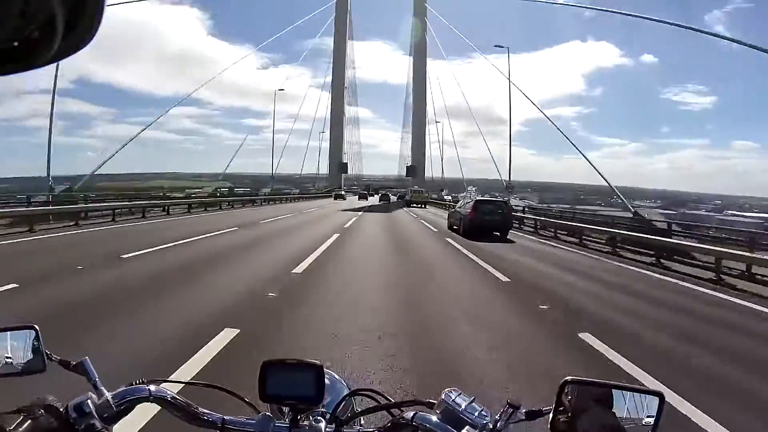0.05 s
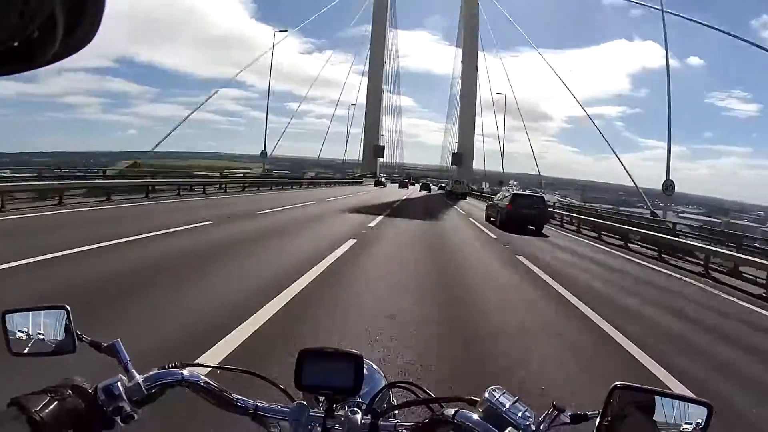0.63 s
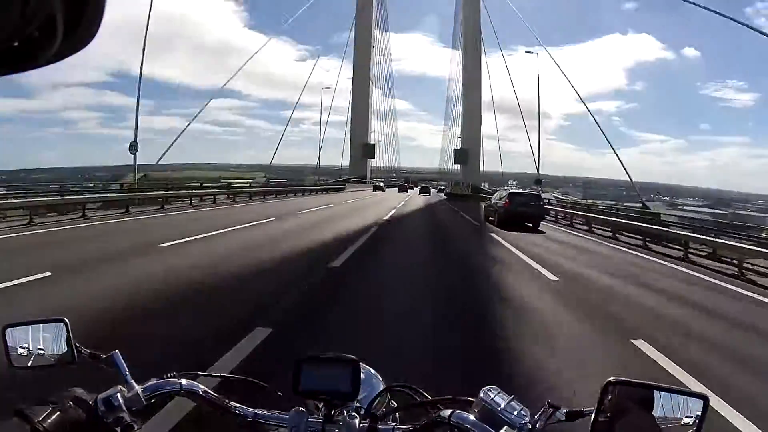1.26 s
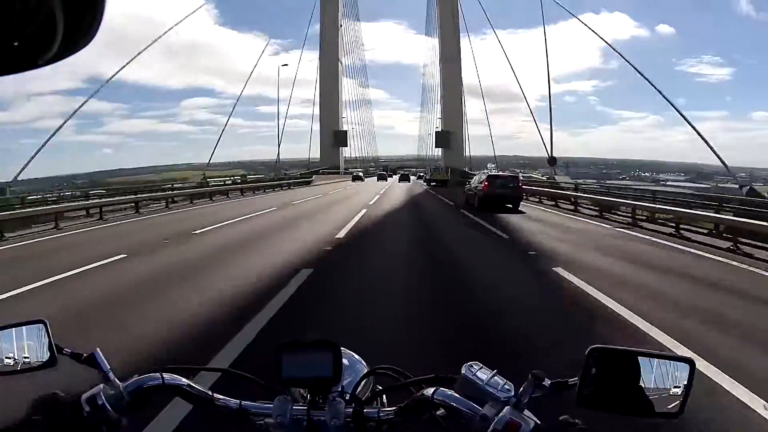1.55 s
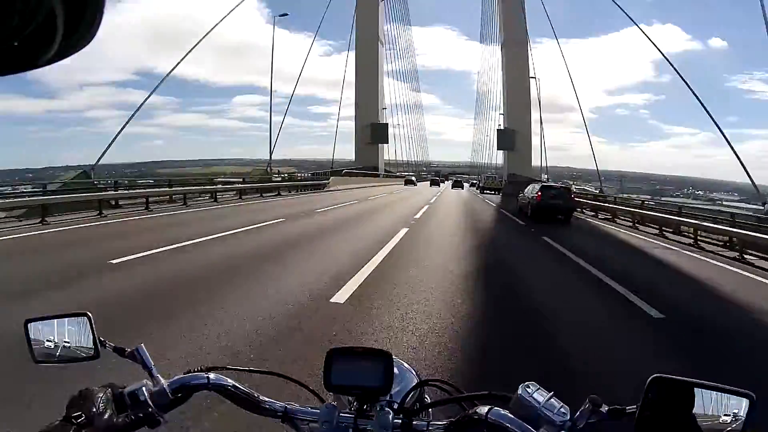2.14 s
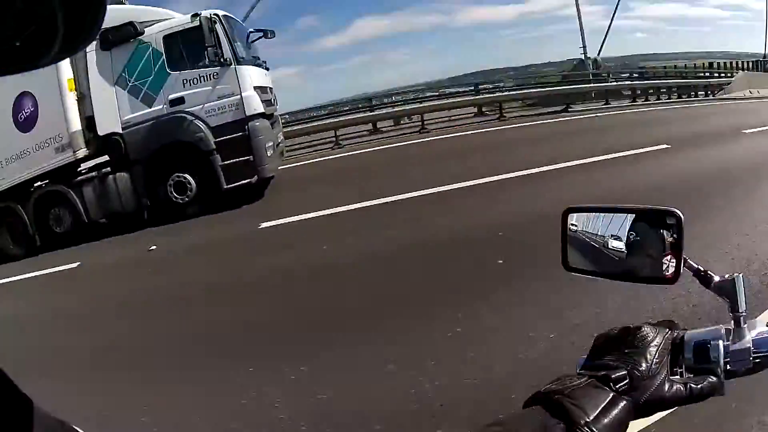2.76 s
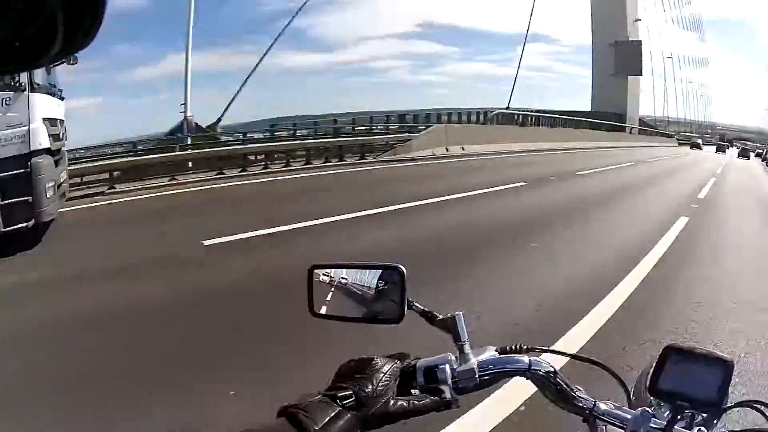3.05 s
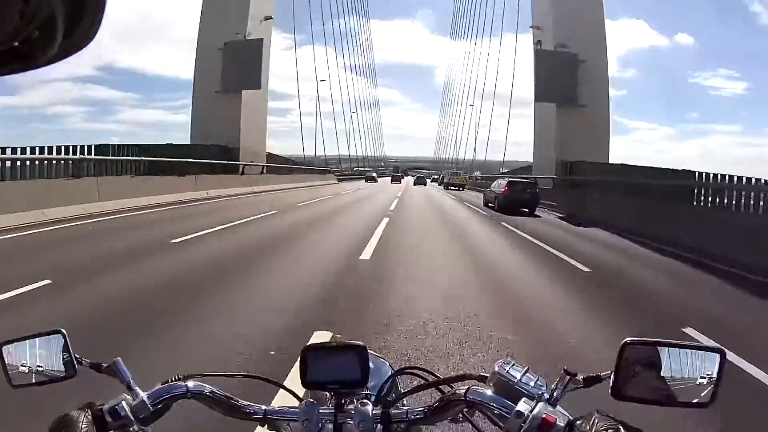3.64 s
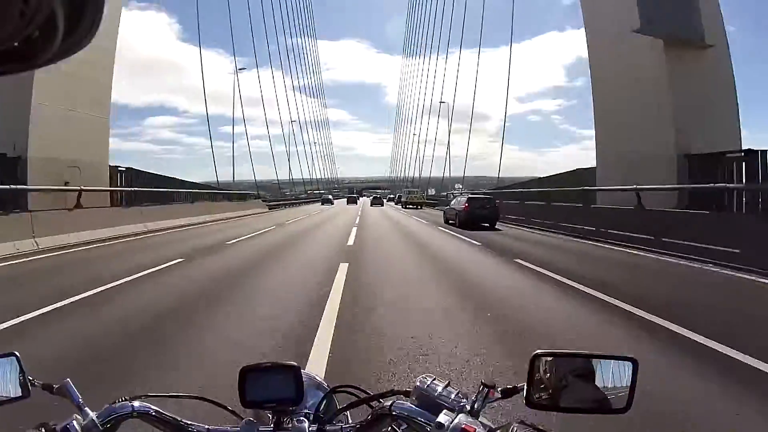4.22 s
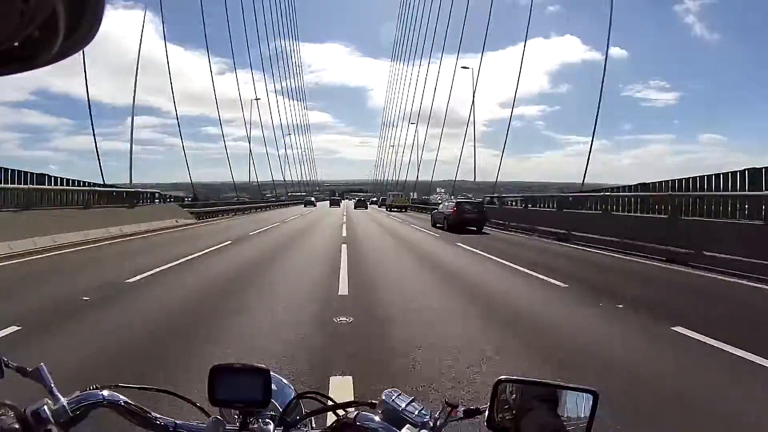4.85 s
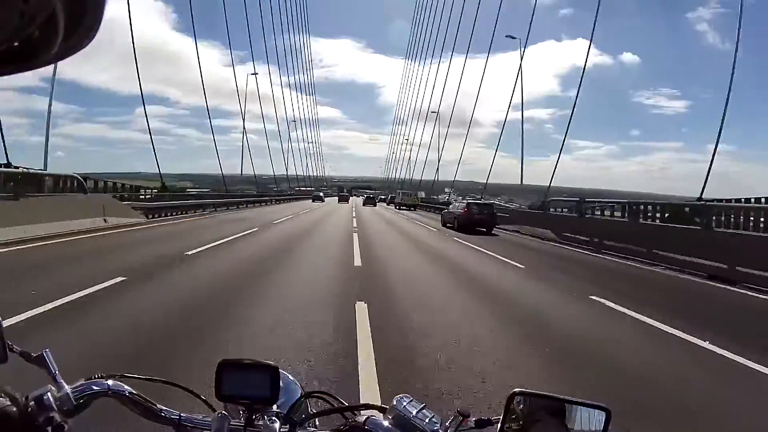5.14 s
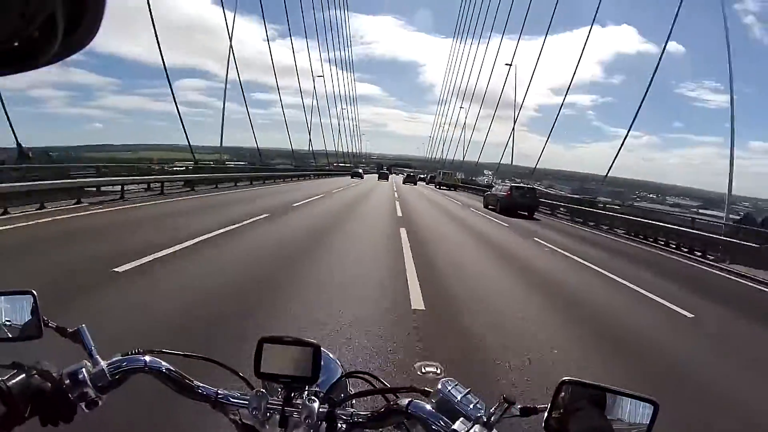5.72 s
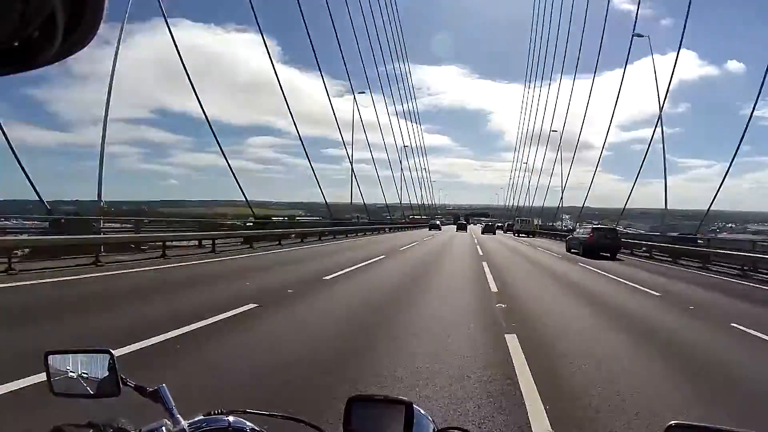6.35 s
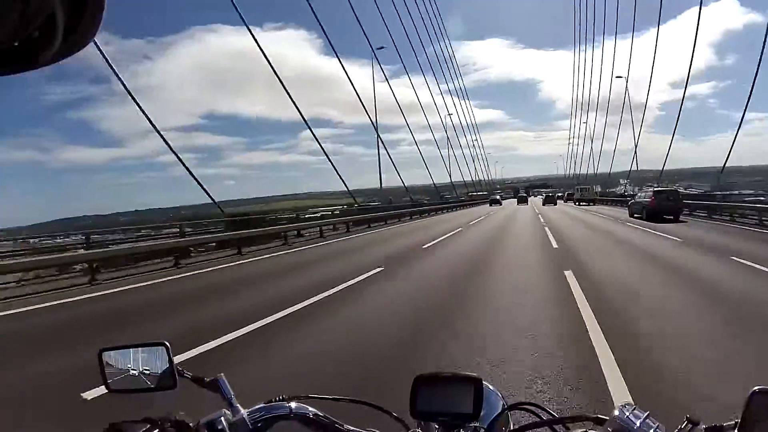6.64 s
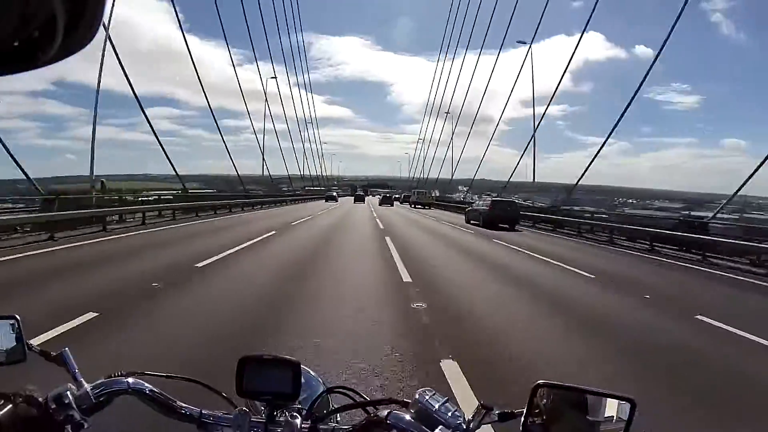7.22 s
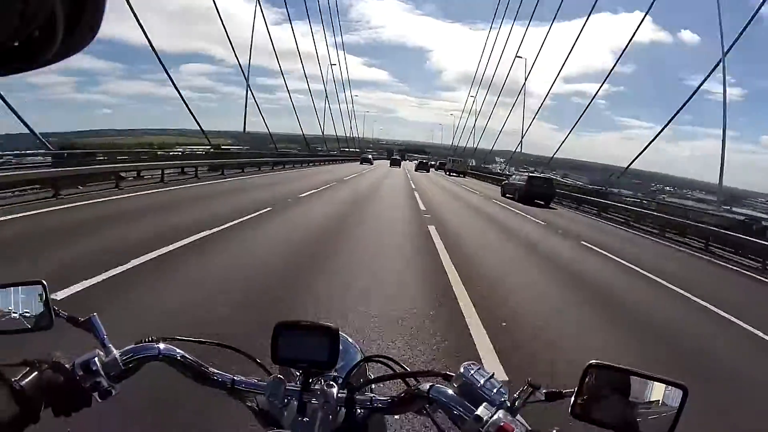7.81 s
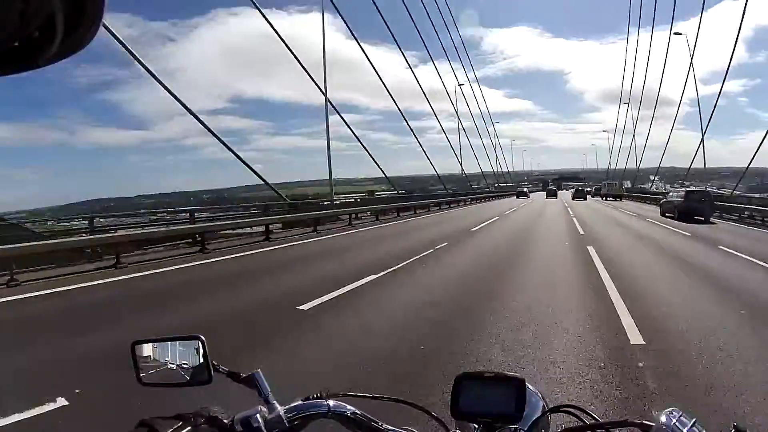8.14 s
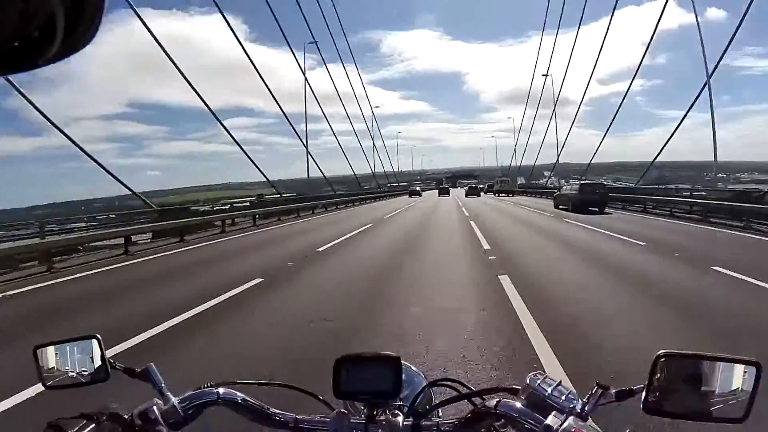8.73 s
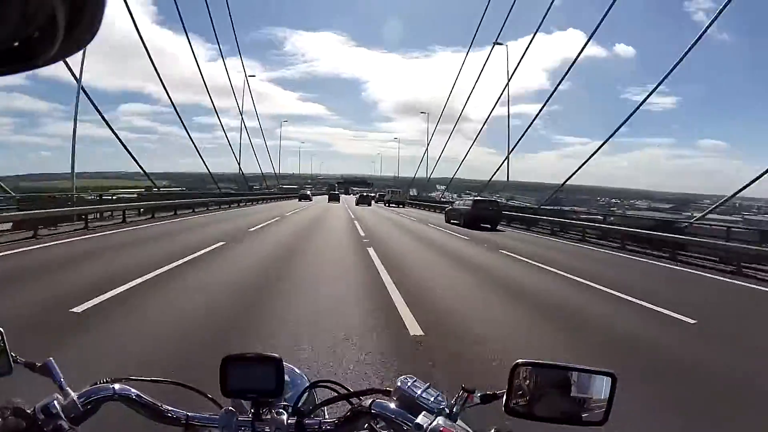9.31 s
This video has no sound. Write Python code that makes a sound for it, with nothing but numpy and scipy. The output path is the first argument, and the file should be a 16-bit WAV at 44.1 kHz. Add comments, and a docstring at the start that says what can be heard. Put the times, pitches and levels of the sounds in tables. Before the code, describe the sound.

Strong wind buffets the microphone on a moving motorcycle, with crackles, small ticks and a low exhaust drone emerging near the end.

```python
"""Wind buffeting a helmet camera's microphone, on a V-twin motorcycle crossing a road bridge.
Eddies rumble, thump and crackle at the microphone port, and the rush brightens as the head turns.
Something loose on the mount ticks, and the exhaust rises out of the wind as the throttle opens.
A faint, steady, wide hiss lies underneath. Now and then the whole mix ducks and creeps back."""
import sys
import numpy as np
from scipy import signal
from scipy.fft import rfft, irfft, next_fast_len
from scipy.io import wavfile
from scipy.ndimage import uniform_filter1d

SR = 44100
rng = np.random.default_rng(int(sys.argv[2]) if len(sys.argv) > 2 else 0)


def to_wav(sig):
    """Store sig (one row per channel, or 1-D mono) as 16-bit WAV at the path in sys.argv[1].

    Samples outside -1..1 are clipped; the rate is SR.
    """
    pcm = np.clip(np.atleast_2d(sig), -1, 1) * 32767
    pcm = np.round(pcm).astype(np.int16)
    wavfile.write(sys.argv[1], SR, pcm.T)  # frames by channels


N = 422037
T = np.arange(N) / SR

# tone of the airflow, from the largest eddies to the smallest: f/Hz, level/dB
BUFFET_EQ = [(20, -1), (45, -4), (70, 2), (160, 0), (220, -2), (330, -9.5), (500, -16.5), (900, -44)]
ROAR_EQ = [(150, -33.5), (300, -1.5), (420, -2.5), (650, -6.5), (1000, -14.5), (1600, -24.5), (3000, -43.5)]
RUSH_EQ = [(500, -13), (1150, 4.5), (1600, 3), (2300, 2.5), (3200, -0.5), (4300, -10), (6000, -27.5),
           (9000, -36.5)]
HISS_EQ = [(2500, -8.5), (4000, 0), (5500, 0.5), (7000, -8), (8500, -9.5), (10200, -11), (12000, -20),
           (15000, -38.5)]
# the five wind layers (rumble, boom, roar, rush, hiss), centre of each: f/Hz
LAYER_CENTRES = [65, 200, 480, 2300, 6500]
# their base balance: level/dB
LAYER_BALANCE = [-19, -19.5, -34, -49.5, -58]
# slow drift in the strength of the airflow: t/s, level/dB
FLOW_DRIFT = [(0, 0.7), (1.2, 0.64), (2.199, -0.4), (4.4, -1.3), (5.9, 0), (7, 1.87), (8, 0.85),
              (9.57, -0.2)]
# gusts (lulls where negative), lower in pitch for larger eddies: crest t/s, length/s, lift/dB, f/Hz
GUSTS = [(0.005, 0.05, 20, 130), (0.199, 0.1, 8.5, 234), (0.541, 0.26, 8, 201), (0.693, 0.078, 6.5, 270),
         (0.996, 0.12, 7, 75), (1.222, 0.13, 8, 600), (1.426, 0.084, 6, 790), (1.413, 0.12, 6.5, 54.8),
         (1.61, 0.17, 7.5, 161), (2.14, 0.24, 5.5, 69.3), (2.592, 0.22, 15, 343), (2.743, 0.15, 9.5, 220),
         (2.928, 0.11, 5.5, 349), (3.07, .07, 7, 3200), (3.15, 0.038, -8, 2300), (3.219, 0.034, 11, 3370),
         (3.288, 0.02, 1, 3400), (3.32, 0.046, -5, 2320), (3.387, 0.072, 7.5, 3400), (3.472, 0.13, 13, 172),
         (3.638, 0.11, 6, 200), (3.64, 0.11, 1, 4500), (3.995, 0.37, 7.5, 180), (4.167, 0.17, 7, 190),
         (4.306, 0.13, 9.5, 120), (4.581, 0.089, 12.5, 210), (4.675, 0.037, 7, 190), (4.82, 0.12, 8.5, 240),
         (4.968, 0.076, 11.5, 139), (5.173, 0.13, 7, 280), (5.361, 0.23, 8.5, 260),
         (5.563, 0.1, 4.5, 128.5), (5.82, 0.058, 5.5, 200), (6.045, 0.078, 4, 200),
         (6.186, 0.097, 7.5, 350), (6.742, 0.047, 7.5, 4200), (6.794, 0.028, 7, 4187),
         (6.876, 0.038, 5, 4200), (6.94, 0.31, 2, 150), (7.09, 0.26, 2.5, 4500), (7.127, 0.052, 5.5, 200),
         (7.681, 0.069, 8.5, 150), (7.99, 0.15, 4, 300), (8.3, 0.67, -5, 170), (8.855, 0.023, 10, 70),
         (9.24, 0.088, 8, 110), (9.461, 0.11, 8, 450)]
# a look over the shoulder and two glances; the curves add up to the angle off the wind: t/s, angle/deg
HEAD_TURNS = [
    [(2.18, -2), (2.27, 11.5), (2.41, 7), (2.48, 42), (2.6, 39), (2.67, 58), (2.85, 69), (3.03, 52),
     (3.2, 45), (3.3, 35), (3.39, 18), (3.45, 6), (3.62, -3)],
    [(6.2, 4.4), (6.7, 11), (6.73, 24), (6.87, 21.6), (6.91, 3.5)],
    [(8.07, 14), (8.19, 38.6), (8.29, 18), (8.56, 29), (8.68, 33.6), (8.76, 13)],
]
# as the port turns, air rushes over its edge, then roars on it broadside and loses its hiss:
# angle/deg, rumble/dB, boom/dB, roar/dB, rush/dB, hiss/dB
ANGLE_MIX = [(0, 2, 3.5, 2.5, -8, -1), (17.5, -1.5, -4, -2.5, 4, 0.46), (35.2, 0, -8, 2.2, 16.5, 3.5),
             (56, -6, -6, 1, 14.5, -3.5), (79.3, -2, -1.5, 6.5, 5, -31)]
# gusts that slap the microphone: t/s, relative level/dB, brightness/dB, t60/s
SLAPS = [(0.23, -10, -23, 0.03), (0.781, -3, -26, 0.029), (1.139, -17, -17, 0.13), (1.661, -6.5, -23, 0.03),
         (2.467, -18, -11, 0.099), (2.764, -8.5, -15.5, 0.024), (2.802, -8, -24, 0.03),
         (3.163, -17, -12.5, 0.054), (3.562, -18, -13, 0.084), (4.176, -8.5, -17, 0.025),
         (4.59, -9.5, -23.5, 0.032), (4.683, -12.5, -11, 0.016), (5.824, -6, -39.5, 0.04),
         (7.872, -12.5, -18.5, 0.028), (8.421, -17.5, -10.5, 0.036), (8.677, -12.5, -11, 0.044),
         (8.852, -14, -14, 0.021)]
# single eddies striking the port: t/s, signed strength
THUMPS = [(.784, 1), (2.585, 0.6), (2.614, 0.18), (2.765, -0.88), (2.807, -0.2), (2.9506, -.45),
          (3.488, 0.97), (4.178, 1), (4.685, 0.76), (5.825, 1), (7.877, -0.36), (8.841, -0.54)]
# rips of the flow while the port is broadside: t/s, level/dB
RIPS = [(2.7175, -1), (2.744, -3), (2.754, -4), (2.772, -0.5), (2.8535, -9), (2.8832, -9), (2.902, -8),
        (2.915, -6)]
# strong crackles at the port: t/s, relative level/dB
CRACKLES = [(.2344, -51), (.6634, -54), (1.246, -48), (2.1735, -48), (2.2857, -48), (2.9506, -49.5),
            (3.4885, -45.5), (3.6281, -49), (5.5947, -48), (5.8251, -44), (6.888, -47), (7.753, -48),
            (8.2577, -51), (8.6139, -51), (8.745, -49), (8.8437, -44)]
# tone of a crackle: f/Hz, level/dB
CRACKLE_EQ = [(700, 11), (2500, 7.5), (7000, 0), (14000, -4)]
# ticks of the loose mount: t/s, relative peak/dB, low ring/dB, top ring/dB
TICKS = [(0.4713, -22.5, -11.5, -7), (0.489, -31, -9, -4), (0.577, -26.5, -5, -3), (0.6841, -18, -5, 2),
         (0.777, -14.5, 1, 3), (0.8736, -15.5, 1, 2), (0.989, -30.5, -15, 2), (1.096, -26, -18, 3),
         (1.933, -27.5, -5, -2), (3.6595, -36, -3, -3), (4.066, -36, -6, 3), (4.7223, -33.5, -3, -3),
         (5.1316, -18, 1, 2), (5.301, -18.5, 2, 0), (5.468, -18.5, 3, 3), (7.1564, -36.5, -6, 11),
         (7.711, -22.5, 5, 1), (7.9532, -17.5, -8, 8), (8.077, -29, 2, -2), (8.857, -23, -1, -4),
         (8.864, -30, -6, -8), (9.422, -20, -1, 0)]
# ringing modes of the mount: f/Hz, level/dB, t60/s
MOUNT_MODES = [(2650, -4, .004), (3250, -5, .003), (3800, -4, .003), (5100, -1, .0035), (5700, 0, .003),
               (6300, -2, .003), (7200, -15, .002), (9900, -13, .0018), (12500, -18, .0015)]
# engine speed in four-stroke cycles: t/s, rate/Hz
CYCLE_RATE = [(0, 30.24), (4, 30.05), (4.8, 29.9), (5.8, 29.85), (7.1, 29.7), (7.6, 29.84), (8.1, 30.2),
              (9, 31.18), (9.57, 31.73)]
# the exhaust's boom follows the throttle, its bark the engine load: t/s, level/dB
BOOM_FADER = [(0, -23.5), (2, -23.5), (3.4, -24.5), (5, -23), (7.1, -21), (7.65, -16.5), (8.83, -15.5),
              (9.1, -18), (9.57, -19)]
BARK_FADER = [(0, -38.5), (7.1, -41), (7.7, -32), (8.8, -28.3), (9.57, -28.5)]
# tone of the exhaust pipe's boom and bark: f/Hz, level/dB
BOOM_EQ = [(30, -14), (90, -13), (122, 2), (153, -.5), (214, -9), (245, -14), (275, -5.5), (365, -28)]
BARK_EQ = [(365, -10), (420, -7), (460, 0), (580, -2), (670, -7), (820, -14), (920, -23), (1200, -36)]
# tone of the faint, wide hiss: f/Hz, level/dB
WIDE_HISS_EQ = [(60, 14.5), (200, 9.5), (450, -8.5), (1200, -17.5), (3000, -24.5), (5500, -28),
                (9000, -30.5), (14000, -40)]
# sudden dips of the whole mix: t/s, depth/dB
DIPS = [(0.02, 2.5), (0.795, 2), (3.66, 9.5), (5.835, 3.5), (7.16, 8.5), (8.865, 11.5)]


def wind(rumble_db, boom_db, roar_db, rush_db, hiss_db, split_hz=130, swell_db=1):
    """Large eddies shake the port and break into bursts of smaller, brighter ones."""
    eddies = unit(wander(55) + 2.24 * wander(160))
    buffet = turbulence(BUFFET_EQ, 2.77 * eddies)
    rumble = signal.sosfiltfilt(signal.butter(3, split_hz, fs=SR, output="sos"), buffet)
    boom = buffet - rumble
    # the fine turbulence flares at each crest of the pressure wave
    crests = unit(np.abs(buffet) - np.mean(np.abs(buffet)))
    burst = unit(eddies + .5 * crests)
    roar = turbulence(ROAR_EQ, 1.35 * burst + 2.1 * wander(76))
    rush = turbulence(RUSH_EQ, 2.07 * burst + 0.36 * wander(50))
    hiss = turbulence(HISS_EQ, 1.75 * burst + wander(40))
    small_gusts = undb(swell_db * wander(18.6))
    low_end = rumble * undb(rumble_db) + boom * undb(boom_db)
    return small_gusts * (low_end + roar * undb(roar_db) + rush * undb(rush_db) + hiss * undb(hiss_db))


def airflow_faders(angle_deg, gust_share=0.32, gust_octaves=1.14):
    """Levels in dB of the five wind layers: a drifting flow, recoloured by head turns, lifted by gusts."""
    degrees, *angle_db = np.transpose(ANGLE_MIX)
    levels = np.array([base + np.interp(angle_deg, degrees, column)
                       for base, column in zip(LAYER_BALANCE, angle_db)])
    levels += automation(FLOW_DRIFT)
    for s, length, db, hz in GUSTS:
        during = np.abs(T - s) < length / 2
        swell_db = db * np.cos(np.pi * (T[during] - s) / length)
        # every layer gets a share of the gust; one at its pitch gets all of it
        nearness = np.exp(-(np.log2(np.array(LAYER_CENTRES) / hz) / gust_octaves) ** 2)
        levels[:, during] += np.outer(gust_share + (1 - gust_share) * nearness, swell_db)
    return levels


def turbulence(eq, flutter_db):
    """Flow noise that flutters quickly while its strength is held steady over 90 ms."""
    noise = band(rng.standard_normal(N), eq) * undb(flutter_db)
    span = int(0.09 * SR)
    power = uniform_filter1d(uniform_filter1d(noise ** 2, span), span // 2)
    return noise / np.sqrt(power + 1e-9)


def slaps(body_db=-3, edge_db=6, rise_s=.003):
    """A sudden gust hits the port: a burst of roar with an edge of rush, quickly blown past."""
    t = np.arange(SR // 4) / SR
    attack = 1 - np.exp(-(t / rise_s) ** 2)
    body, edge = np.zeros((2, N))
    for s, db, brightness_db, t60 in SLAPS:
        blow = attack * decay(t, t60)
        add(body, s - rise_s / 2, undb(db + body_db) * blow)
        add(edge, s - rise_s / 2, undb(db + brightness_db + edge_db) * blow)
    return body * turbulence(ROAR_EQ, 0) + edge * turbulence(RUSH_EQ, 0)


def vortices(hits, width_s, round_s):
    """Each hit becomes a passing vortex core: a sharp pressure peak between two shallow troughs."""
    distance = np.hypot(np.arange(-SR // 50, SR // 50) / SR, round_s) / width_s
    return signal.fftconvolve(hits, (1 - distance) * np.exp(-distance), "same")


def thumps():
    """The largest cores land as single thumps."""
    hits = np.zeros(N)
    for s, strength in THUMPS:
        add(hits, s, [strength])
    return vortices(hits, width_s=0.0017, round_s=0.000043)


def spits(flow_db, per_s, lift_db, spread_db, width_s, round_s):
    """Small cores spit at random, riding the level of the flow that carries them."""
    size_db = flow_db + lift_db + spread_db * np.minimum(rng.exponential(size=N), 3)
    hits = (rng.random(N) < per_s / SR) * rng.choice([-1, 1], N) * undb(size_db)
    return vortices(hits, width_s, round_s)


def tearing(angle_deg, rush_db, onset_deg=12):
    """At an angle the flow tears off the port's edge: a dense rasp, and a few rips when broadside."""
    torn_db = np.where(angle_deg > onset_deg, rush_db, -np.inf)
    rasp = spits(torn_db, per_s=140, lift_db=14.5, spread_db=3.8, width_s=.00012, round_s=.00005)
    rips = np.zeros(N)
    for s, db in RIPS:
        add(rips, s, [undb(db)])
    return rasp + vortices(rips, width_s=0.00018, round_s=.00009)


def crackles(hiss_db, per_s=16, spread_db=3.5, faint_db=-6, gain_db=7, decay_s=0.0012):
    """Tiny snaps of air at both ports: a few strong ones, and many faint ones that follow the hiss."""
    t = np.arange(SR // 200) / SR
    ports = np.zeros((2, N))
    size_db = hiss_db + faint_db + spread_db * np.minimum(rng.exponential(size=N), 4)
    faint = [(i / SR, size_db[i]) for i in np.flatnonzero(rng.random(N) < per_s / SR)]
    for s, db in [*CRACKLES, *faint]:
        envelope = undb(db + gain_db) * np.exp(-t / decay_s)
        centre = rng.standard_normal(len(t))
        for port in ports:
            add(port, s, envelope * (centre + 2.2 * rng.standard_normal(len(t))))
    return np.array([colour(port, CRACKLE_EQ) for port in ports])


def mount_ticks(gain_db=2, attack_s=0.00018, lag_s=0.00036, bounce_s=0.0017, bounce_db=-9):
    """Small hard contacts snap the well-damped mount and bounce once."""
    out = np.zeros(N)
    t = np.arange(SR // 50) / SR
    hz, db, t60 = np.transpose(MOUNT_MODES)[:, :, None]
    polarity = (-1) ** np.arange(len(hz))[:, None]
    for s, peak_db, low_db, top_db in TICKS:
        gap_s = bounce_s * np.exp(0.25 * rng.standard_normal())
        detuned_hz = hz * (1 + .015 * rng.standard_normal(hz.shape))
        gains = polarity * undb(db + low_db * (hz < 4500) + top_db * (hz > 7000))
        ring = np.sum(gains * np.sin(2 * np.pi * detuned_hz * t) * decay(t, t60), axis=0)
        ring *= 1 - np.exp(-t / attack_s)
        ring *= undb(peak_db + gain_db) / np.abs(ring).max()
        add(out, s + lag_s, ring)
        add(out, s + lag_s + gap_s, undb(bounce_db) * ring)
    return out


def exhaust(firing_deg=(170, 465), cylinder_db=(-1.5, 0), scatter_db=1.4, jitter_cycles=.002):
    """Two cylinders fire at uneven intervals into the pipe, which booms, and barks under load."""
    cycles = np.cumsum(automation(CYCLE_RATE)) / SR
    firings = np.arange(int(cycles[-1]))[:, None] + np.array(firing_deg) / 720
    firings += jitter_cycles * rng.standard_normal(firings.shape)
    firing_db = np.array(cylinder_db) + scatter_db * rng.standard_normal(firings.shape)
    pulses = np.zeros(N)
    pulses[np.searchsorted(cycles, firings)] = undb(firing_db)
    boom = band(pulses, BOOM_EQ) * undb(automation(BOOM_FADER))
    bark = pipe_echo(band(pulses, BARK_EQ)) * undb(automation(BARK_FADER))
    return boom + bark


def pipe_echo(x, trip_s=.003, feedback=.35):
    """All-pass echo: each pulse runs up and down the pipe before it has all left."""
    size = next_fast_len(N)
    delay = np.exp(-2j * np.pi * np.fft.rfftfreq(size, 1 / SR) * trip_s)
    return irfft(rfft(x, size) * (delay - feedback) / (1 - feedback * delay))[:N]


def wide_hiss(level_db=-49):
    """A faint, steady, wide hiss, opposite in left and right."""
    hiss = turbulence(WIDE_HISS_EQ, wander(30)) * undb(level_db + .8 * wander(2))
    return np.array([hiss, -hiss])


def dips(fall_s=.004, recover_s=0.17):
    """A gain that ducks abruptly at each dip and creeps back."""
    db = np.zeros(N)
    for s, depth_db in DIPS:
        since = np.maximum(T - s, 0)
        db -= depth_db * np.minimum(since / fall_s, 1) * np.exp(-since / recover_s)
    return undb(db)


def colour(x, eq):
    """Minimum-phase EQ through points of f/Hz, level/dB."""
    hz, db = np.transpose(eq)
    size = 2 * next_fast_len(N)
    f = np.maximum(np.fft.rfftfreq(size, 1 / SR), 1)
    cepstrum = irfft(np.log(undb(np.interp(np.log(f), np.log(hz), db))))
    # folding the cepstrum keeps any ringing after the hit
    cepstrum[1:size // 2] *= 2
    cepstrum[size // 2 + 1:] = 0
    return irfft(rfft(x, size) * np.exp(rfft(cepstrum)))[:N]


def band(x, eq):
    """EQ with steep skirts beyond its outer points, scaled to rms 1."""
    (low, low_db), (high, high_db) = eq[0], eq[-1]
    return unit(colour(x, [(low / 2, low_db - 30), *eq, (high * 8, high_db - 100)]))


def wander(per_s):
    """Smooth random modulation at rms 1, changing about per_s times a second."""
    span = int(SR / per_s)
    return unit(uniform_filter1d(uniform_filter1d(rng.standard_normal(N), span), span))


def automation(points):
    """A line through timed points, sample by sample, holding its end values."""
    return np.interp(T, *np.transpose(points))


def decay(t, t60):
    """A tail that falls 60 dB in t60 seconds."""
    return np.exp(-np.log(1000) * t / t60)


def add(out, s, sound):
    """Mix a short sound in at time s."""
    i = int(np.clip(s * SR, 0, N - 1))
    out[i:i + len(sound)] += sound[:N - i]


def undb(db):
    """Decibels to gain."""
    return 10 ** (np.asarray(db) / 20)


def unit(x):
    """Scale to rms 1."""
    return x / np.sqrt(np.mean(x ** 2))


def scene(spit_limit_db=-28):
    """Wind, mount and exhaust in the centre, crackles and a faint hiss spread wide; all dip together."""
    angle_deg = sum(automation(turn) for turn in HEAD_TURNS)
    rumble_db, boom_db, roar_db, rush_db, hiss_db = airflow_faders(angle_deg)
    air = wind(rumble_db, boom_db, roar_db, rush_db, hiss_db) + slaps() + thumps()
    spit_db = np.minimum(roar_db, spit_limit_db)  # spits stop growing and merge into a louder roar
    spatter = spits(spit_db, per_s=50, lift_db=5, spread_db=3, width_s=0.00036, round_s=.00006)
    grit = spatter + tearing(angle_deg, rush_db) + crackles(hiss_db)
    return (air + grit + mount_ticks() + exhaust() + wide_hiss()) * dips()


def record(dry):
    """The left port is a little hotter; the camera rounds peaks near full scale and cuts the top."""
    ports = dry * undb([[.12], [-.12]])
    soft_clipped = ports / (1 + ports ** 8) ** (1 / 8)
    high_cut = signal.ellip(8, .2, 70, 15600, fs=SR, output="sos")
    return signal.sosfilt(high_cut, soft_clipped)


dry = scene()
out = record(dry)
to_wav(out)
```